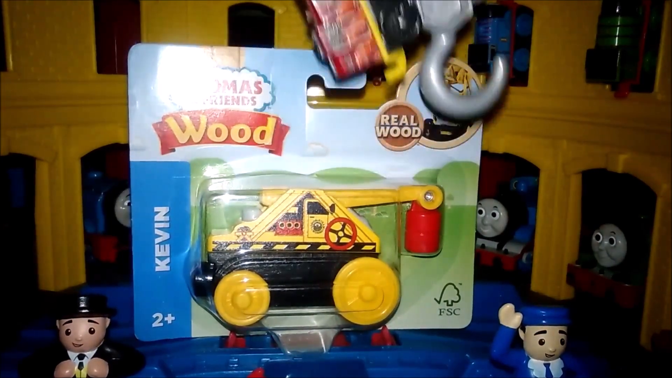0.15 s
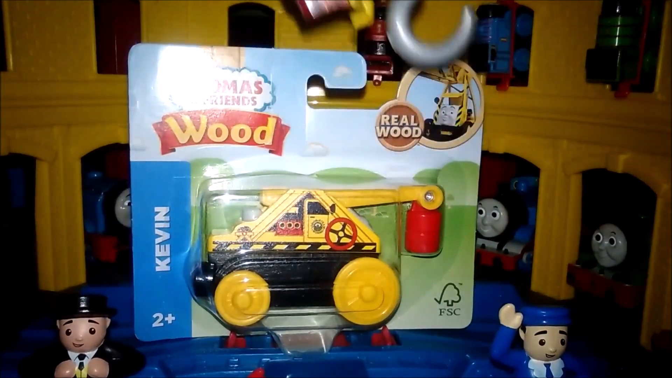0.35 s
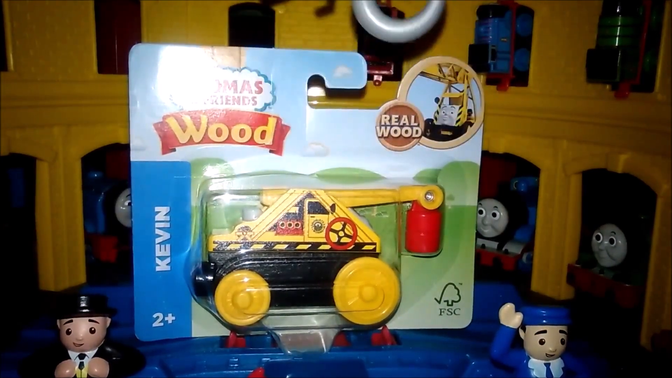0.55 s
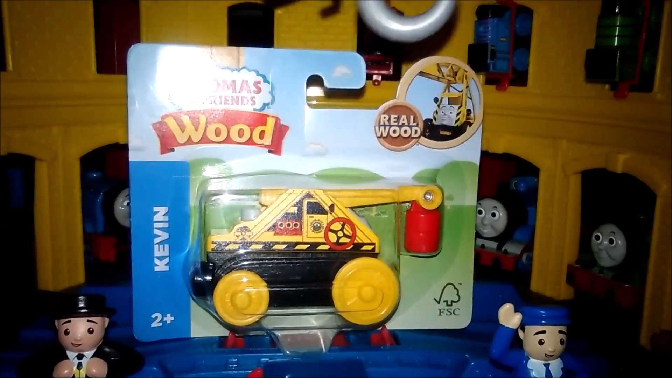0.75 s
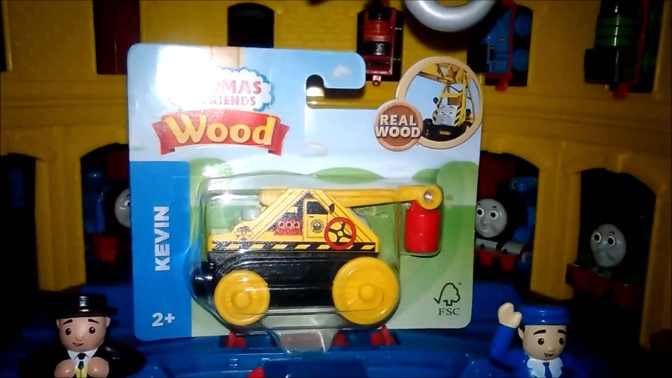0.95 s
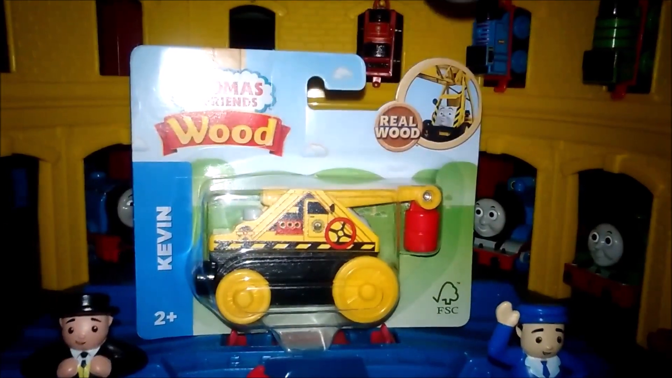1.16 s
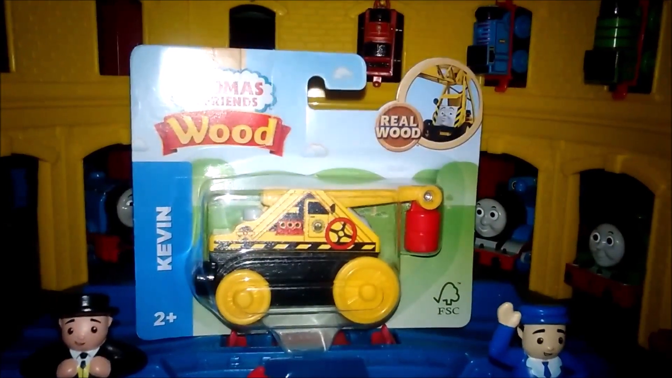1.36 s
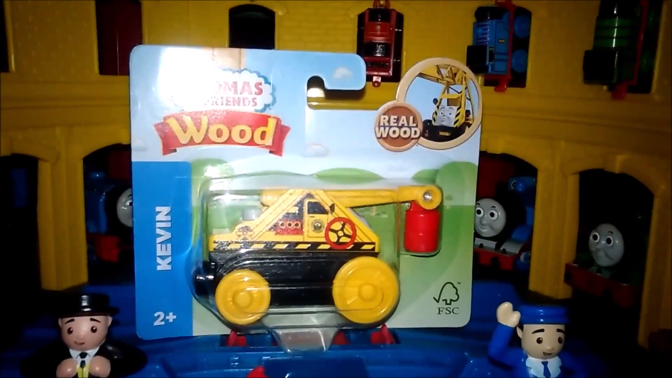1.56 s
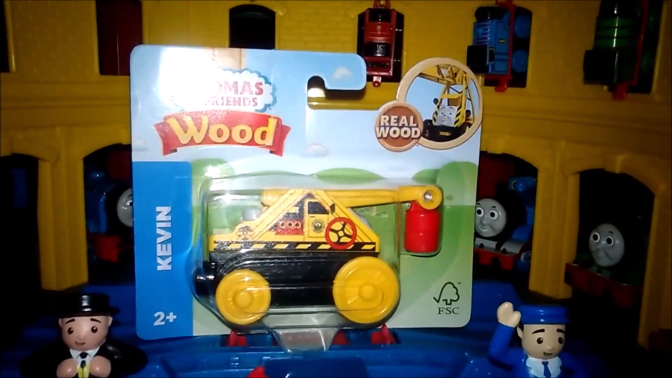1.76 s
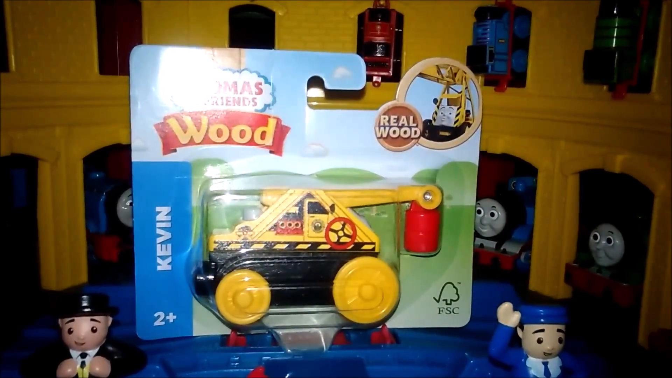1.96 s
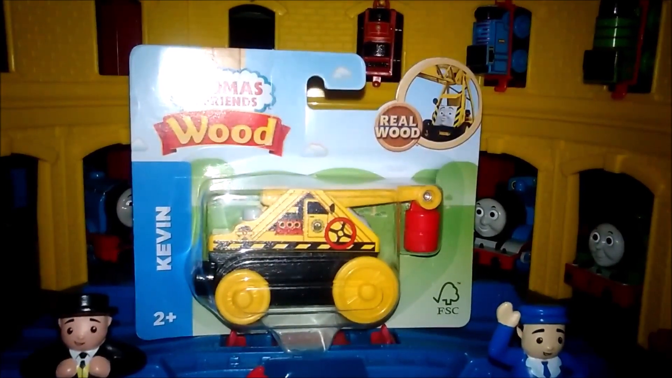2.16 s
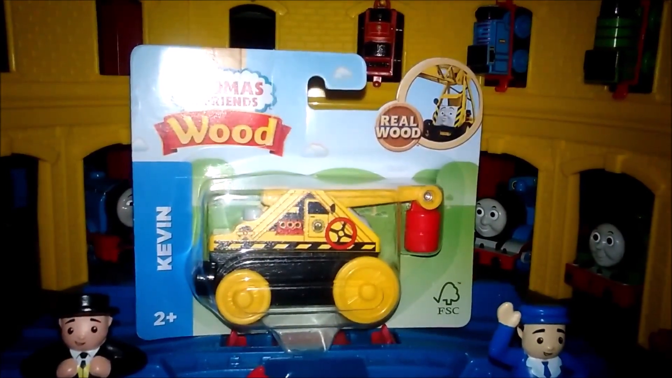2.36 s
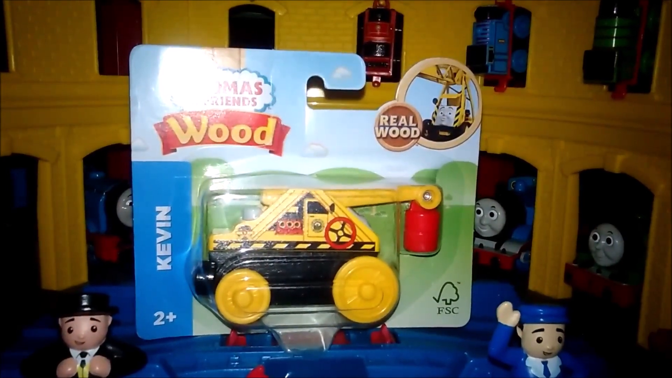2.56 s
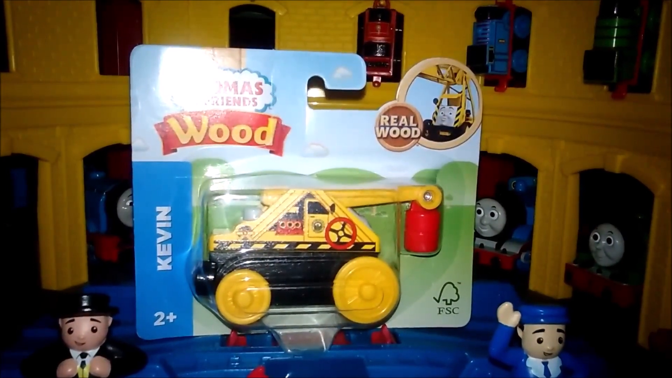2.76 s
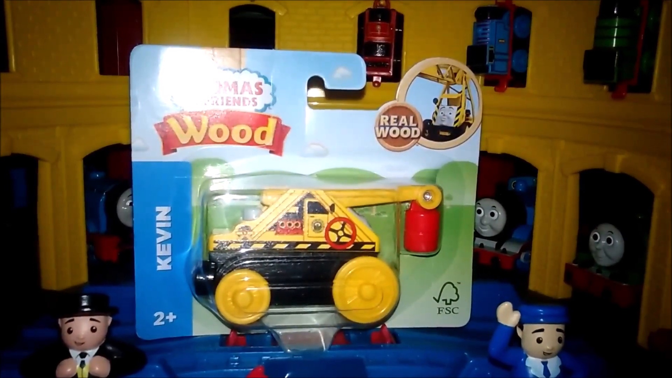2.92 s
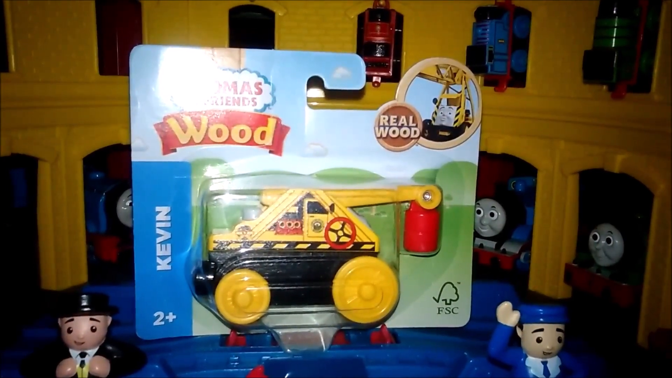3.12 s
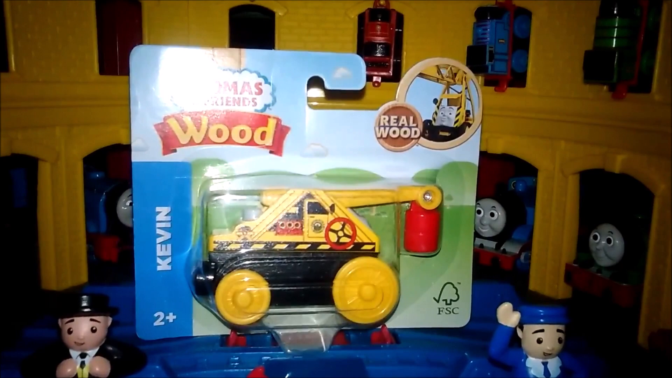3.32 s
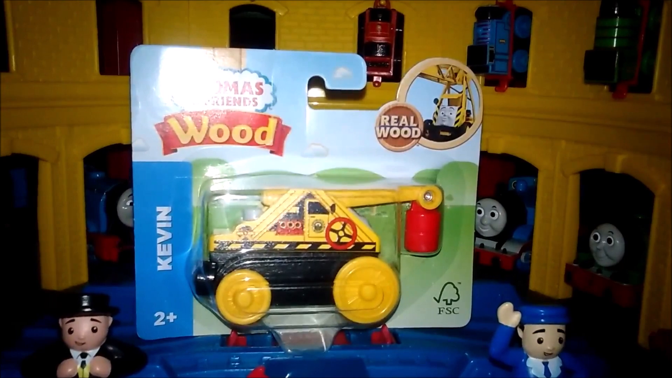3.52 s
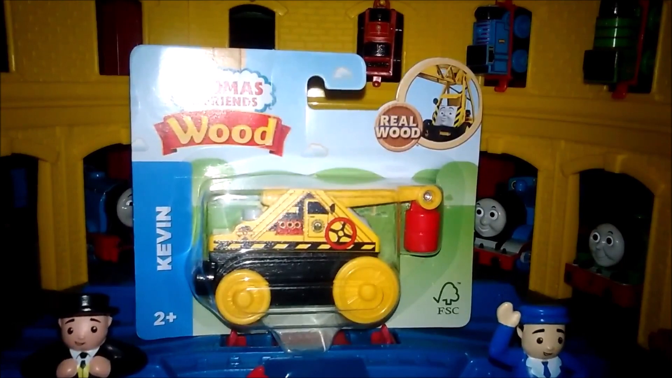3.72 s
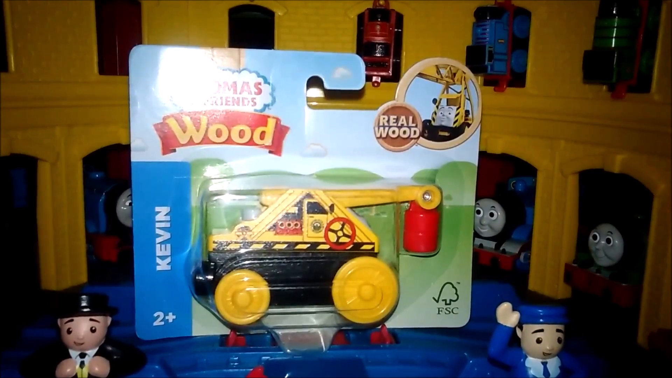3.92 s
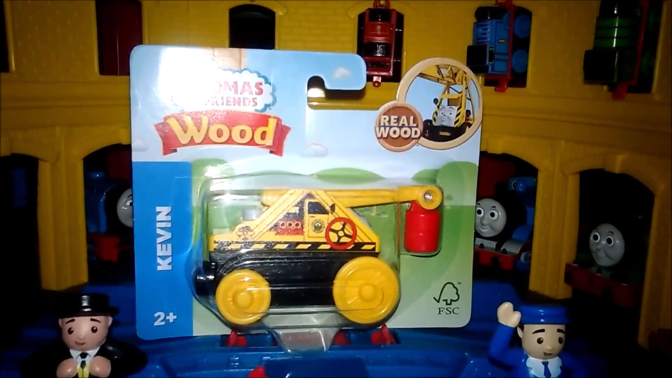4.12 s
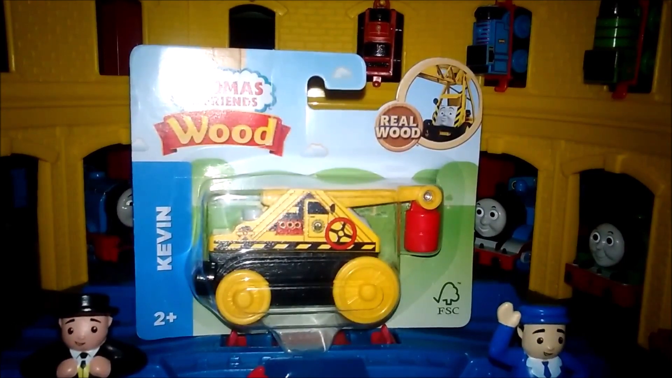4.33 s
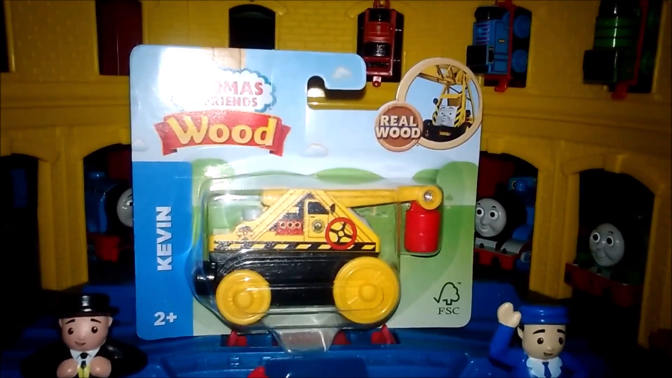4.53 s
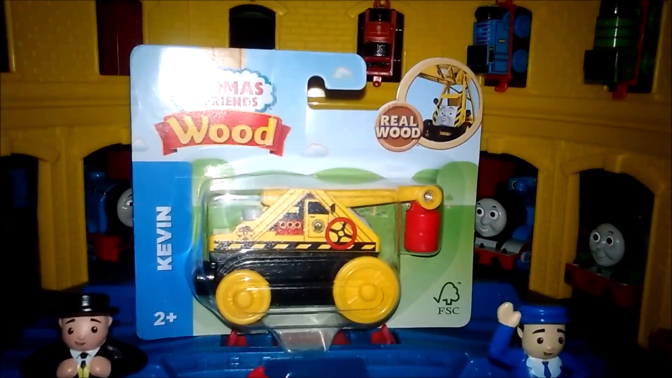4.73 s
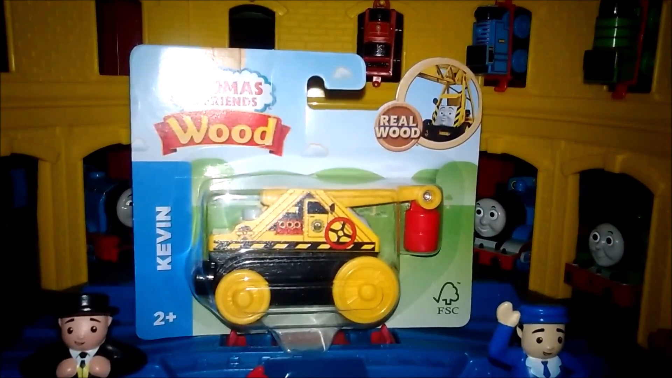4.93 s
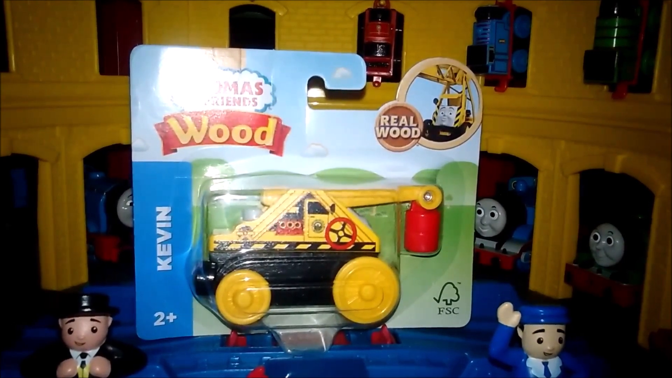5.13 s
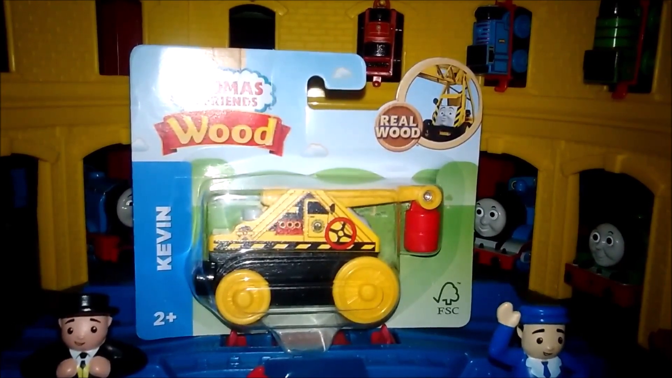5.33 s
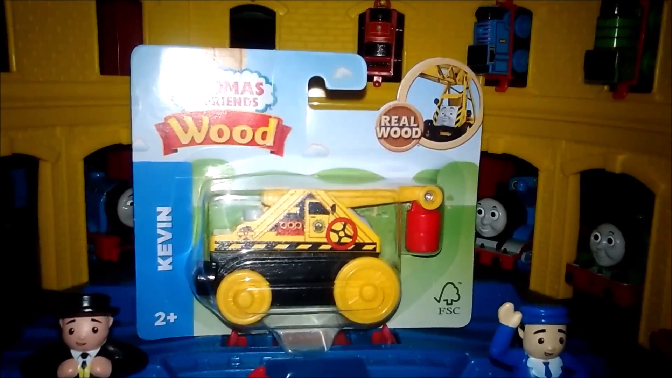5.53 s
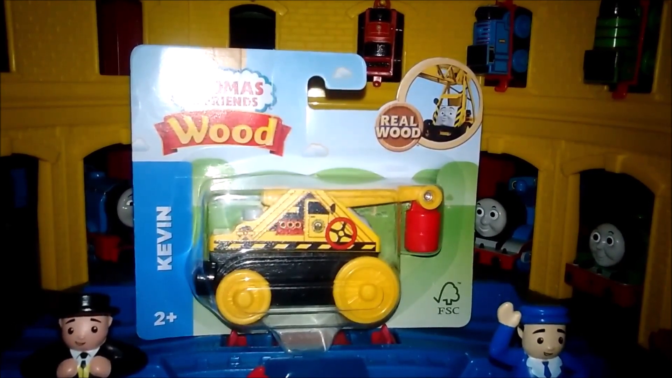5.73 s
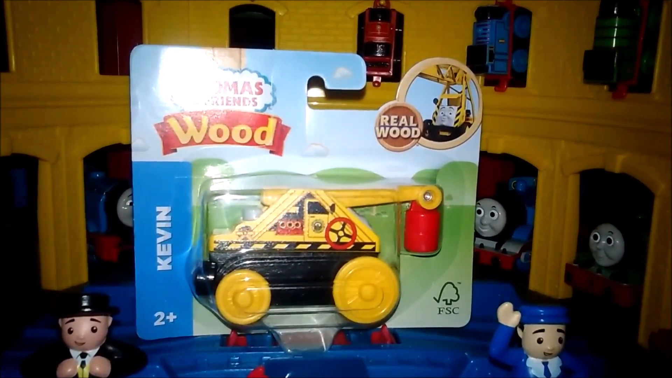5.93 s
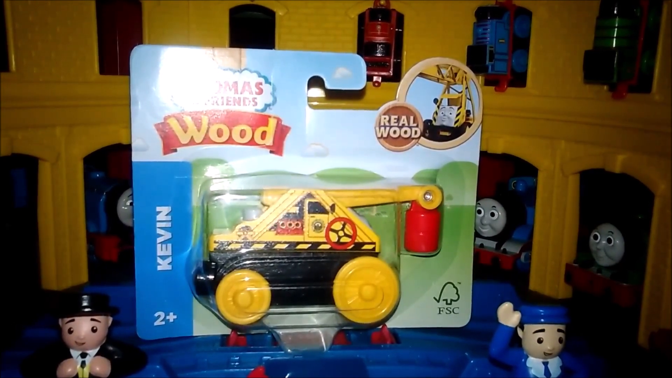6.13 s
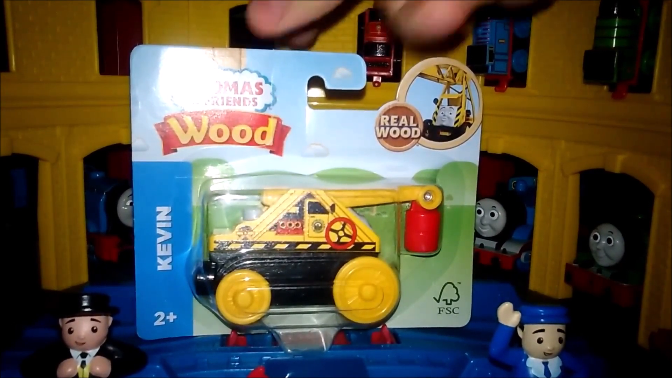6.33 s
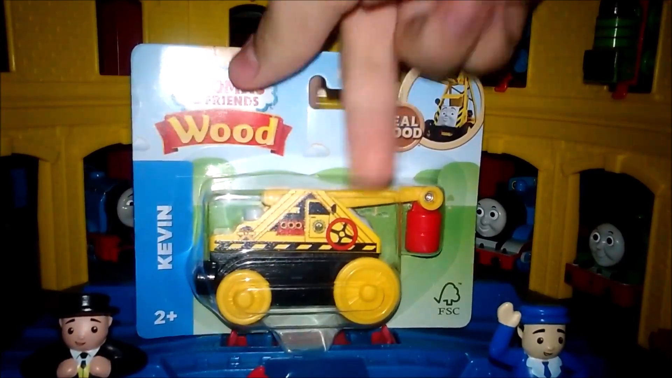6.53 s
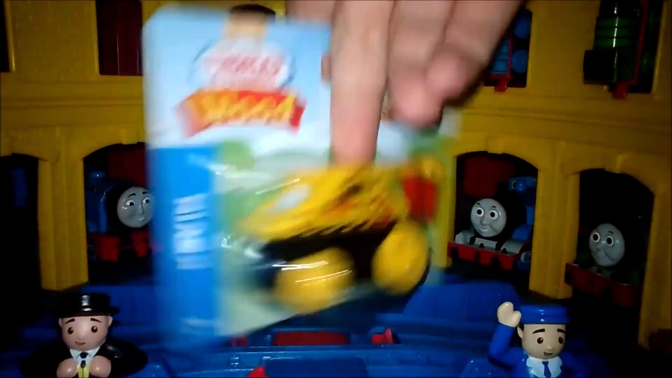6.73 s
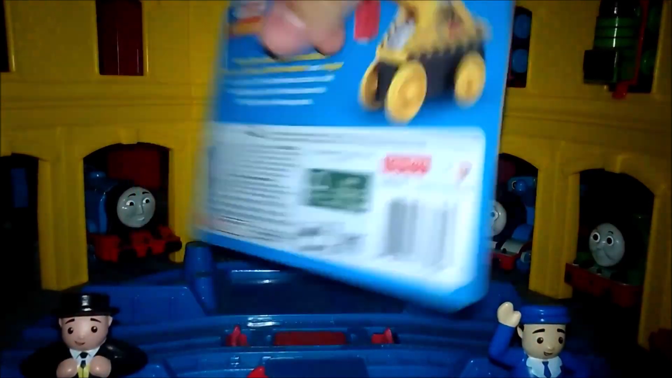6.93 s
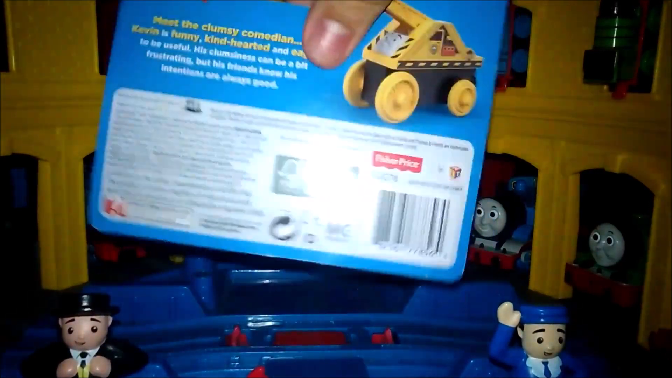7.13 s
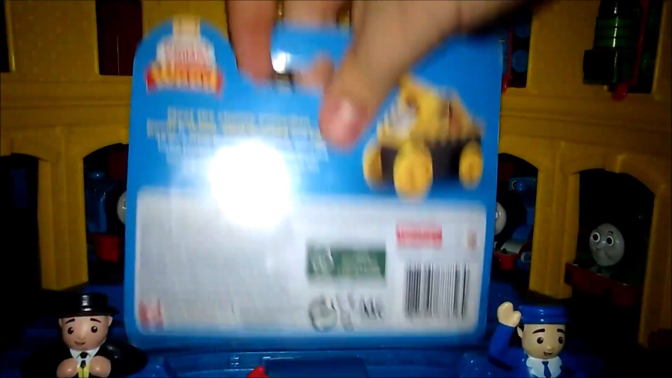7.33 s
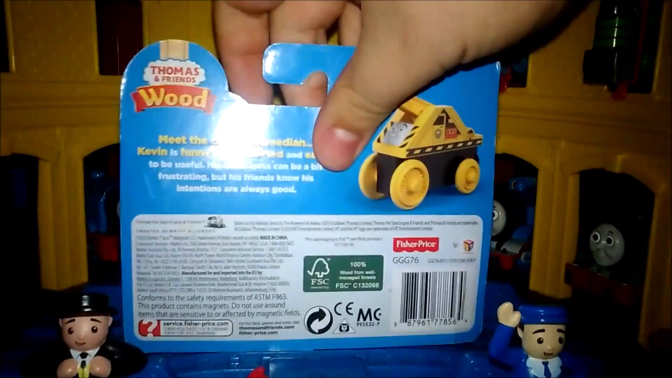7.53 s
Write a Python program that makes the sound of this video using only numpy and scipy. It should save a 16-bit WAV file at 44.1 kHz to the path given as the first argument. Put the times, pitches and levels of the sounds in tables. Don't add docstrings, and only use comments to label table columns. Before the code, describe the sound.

Close to the microphone in a small room, a plastic toy winch is cranked by hand: light ticks and dull knocks, then a fast hard ratchet rattle with thumps through the table, then irregular clicking. Two very loud snaps come close together before it stops. A card-and-plastic pack is picked up and turned with scuffs and taps over low rumble, hum and hiss.

```python
import sys
import numpy as np
from scipy import signal
from scipy.fft import rfft, irfft, next_fast_len
from scipy.io import wavfile
from scipy.ndimage import uniform_filter1d, map_coordinates

SR = 44100
rng = np.random.default_rng(int(sys.argv[2]) if len(sys.argv) > 2 else 0)


def nominal_scale(level):
    x = np.asarray(level, float) / 20
    return 10 ** x


def transcribe(u):
    v = np.clip(np.atleast_2d(u).T, -1, 1)
    q = np.round(v * 32767).astype(np.int16)
    wavfile.write(sys.argv[1], SR, q)


N = 333969
PACK_S = 6.3

# pitch_hz [Hz], width_hz [Hz], level_db [dB]
TEETH = [(3657, 515, -3.5), (4480, 250, 1.5), (5000, 850, -1.5), (6160, 720, 1.5), (6824, 530, 2.5),
         (7500, 2040, -9.5)]
# pitch_hz [Hz], width_hz [Hz], level_db [dB]
FRAME = [(1520, 275, -1.5), (1990, 237, 2), (2300, 540, -1), (3100, 400, -6.5)]


def unit(x):
    return x / np.sqrt(np.mean(x ** 2) + 1e-20)


def along(points, hz):
    f, v = np.transpose(points)
    return np.interp(np.log(hz + 1), np.log(f + 1), v)


def curves(rows):
    s, *columns = np.transpose(rows)
    t = np.arange(N) / SR
    from_edge = np.minimum(t - s[0], s[-1] - t) / 0.015
    open_start = s[0] < 0.05
    open_end = (s[-1] > 7.5) * (t > s[0] + 0.05)
    inside = np.clip(from_edge + open_start + open_end, 0, 1)
    return [np.interp(t, s, column) for column in columns] + [inside]


def wobble(rate):
    coarse = np.arange(0, N + 64, 64)
    knots = rng.standard_normal(int(N * rate / SR) + 6)
    return np.interp(np.arange(N), coarse, map_coordinates(knots, [coarse * rate / SR]))


def filtered(x, response):
    m = next_fast_len(N + 8192, real=True)
    return irfft(rfft(x, m) * response(np.fft.rfftfreq(m, 1 / SR)), m)[..., :N]


def noise(spectrum):
    return unit(filtered(rng.standard_normal(N), lambda hz: nominal_scale(along(spectrum, hz))))


def ringing(x, modes):
    def shape(f):
        total = 0
        for k, (centre, width, db) in enumerate(modes):
            damping = 1j * f * width
            total = total + (-1) ** k * nominal_scale(db) * damping / (centre * centre - f * f + damping)
        return total

    mean = np.sqrt(np.mean(abs(shape(np.linspace(1, SR / 2, num=4000))) ** 2))
    return filtered(x, shape) / mean


def rumble():
    # pitch_hz [Hz], level_db [dB per Hz]
    deep = [(8, -14), (20, 18), (45, -2), (65, 1), (100, -67)]
    # pitch_hz [Hz], level_db [dB per Hz]
    upper = [(35, -40), (60, 2.5), (100, 2.5), (125, -7), (170, -26), (260, -50.5)]
    # time_s [s], level_db [dB]
    shake = [(0, -44.5), (.33, -47), (1.07, -38), (1.82, -40.5), (2.09, -32.5), (3.52, -37), (3.93, -33.5),
             (4.32, -50), (5.01, -35.5), (5.9, -40.5), (6.5, -40), (7.25, -34.5), (7.57, -31)]
    # time_s [s], level_db [dB]
    traffic = [(0, -42), (.33, -47), (1.07, -43.5), (1.82, -50), (2.09, -41.5), (3.52, -33.5),
               (3.93, -37.5), (4.32, -32), (4.63, -33), (5.01, -34.5), (5.9, -39), (6.1, -24.5),
               (7.57, -36)]
    shake_level = nominal_scale(curves(shake)[0] + 4.5 + 4.0 * wobble(8.5))
    traffic_level = nominal_scale(curves(traffic)[0] - 1.5 + 1.7 * wobble(10))
    return shake_level * noise(deep) + traffic_level * noise(upper)


def hiss():
    # pitch_hz [Hz], level_db [dB per Hz]
    air = [(60, -55), (130, -18), (160, -14.5), (220, -14.5), (310, -16), (360, -21.5), (500, -26.5),
           (1000, -33), (2100, -36.5), (3500, -41.5), (6400, -38.5), (8000, -45), (11900, -51.5),
           (14500, -47)]
    return nominal_scale(-46.5) * noise(air)


def mains_hum():
    # pitch_hz [Hz], level_db [dB]
    mains = [(120.3, -38.5), (166, -83), (312, -57)]
    t = np.arange(N) / SR
    return sum(np.sqrt(2) * nominal_scale(db + 1.5 * wobble(6.7)) * np.sin(2 * np.pi * hz * t) for hz, db in mains)


def tone(rows, flutter_db):
    hz, db, inside = curves(rows)
    level = np.sqrt(2) * nominal_scale(db + flutter_db * wobble(11)) * inside
    return level * np.sin(2 * np.pi * np.cumsum(hz) / SR)


def vehicles():
    # time_s [s], pitch_hz [Hz], level_db [dB]
    slowing = [(3.88, 118, -31.5), (4.478, 79.86, -30), (4.612, 79.7, -39), (4.788, 70.7, -37),
               (5.002, 63.5, -26), (5.08, 63.8, -42)]
    slowing_again = [(5.05, 117.8, -31), (5.546, 86.7, -44), (5.726, 81, -43), (5.8, 83, -35)]
    sinking = [(3.699, 72.9, -24), (3.85, 58.4, -34), (4.0, 44.4, -42), (4.15, 33, -30)]
    idling = [(5.95, 66.3, -55), (6.15, 66.85, -23), (6.25, 65, -27.5), (6.4, 65.17, -14.5),
              (6.6, 65.12, -21.5), (6.9, 65.1, -21), (7.25, 65.47, -23), (7.57, 67.5, -32)]
    booming = [(6.05, 97.6, -46), (6.07, 97, -56), (6.324, 88, -28.5), (6.904, 91.4, -37),
               (6.95, 87.5, -53)]
    return sum(tone(rows, flutter_db=-0.7) for rows in (slowing, slowing_again, sinking, idling, booming))


def table_bumps():
    # time_s [s], peak_db [dB], pitch_hz [Hz], length_cycles [cycles]
    pushes = [(0.872, -23, 45, 1.8), (1.954, -18, 31, 2.2), (2.335, -7.5, 48.7, 0.86),
              (2.709, -9.5, 59.4, 1.66), (2.705, -16, 148, 1.4), (2.76, -12, 49.4, 1.1),
              (2.851, -18, 41, 2.6), (3.083, -9, 37.2, 0.48), (3.682, -13.5, 110, 3.4),
              (5.212, -20.5, 35, 1.5), (5.737, -13, 38.7, 0.5), (7.292, -9, 38.3, 2.8),
              (7.299, -27.5, 149, 1.6), (7.48, -11.5, 211, 1.9), (7.565, -22.5, 230, 1.45)]
    t = np.arange(N) / SR
    out = np.zeros(N)
    for s, db, hz, cycles in pushes:
        swell = np.exp(-((t - s) * hz / cycles * 1.78) ** 2)
        out -= nominal_scale(db) * swell * np.cos(2 * np.pi * hz * (t - s))
    return out


def room(x):
    # pitch_hz [Hz], t60_s [s]
    decay = [(200, 0.2), (2000, 0.17), (6000, 0.18), (12000, 0.26)]
    out, hop = np.zeros(N + SR), SR // 3
    for start in range(0, N, hop):
        hz, t, z = signal.stft(rng.standard_normal(hop), SR, nperseg=256)
        dying = z * nominal_scale(-60 * t / along(decay, hz)[:, None])
        tail = signal.istft(dying, SR, nperseg=256)[1]
        wet = signal.fftconvolve(x[start:start + hop], tail / np.linalg.norm(tail))
        out[start + 130:][:len(wet)] += wet
    return out[:N]


def squeaks():
    # start_s [s], end_s [s], pitch_hz [Hz], width_hz [Hz], level_db [dB]
    slides = [
        (1.338, 1.452, 2180, 450, -41.5),
        (3.812, 3.883, 1780, 400, -42),
        (6.88, 7.079, 2110, 200, -54),
        (7.15, 7.32, 2094, 200, -54),
    ]
    out = np.zeros(N)
    for start, end, hz, width_hz, db in slides:
        span = slice(round(start * SR), round(end * SR))
        size = span.stop - span.start
        band = signal.butter(2, [hz - width_hz / 2, hz + width_hz / 2], "band", fs=SR, output="sos")
        squeak = unit(signal.sosfilt(band, rng.standard_normal(SR // 2))[:size])
        out[span] += nominal_scale(db) * np.sqrt(np.hanning(size)) * squeak
    return out


def effort(rows):
    s, db, swell, fade = np.transpose(rows)[:4, :, None]
    t = np.arange(0, N + 32, 32) / SR
    each = db - 20 * np.maximum((s - t) / swell, (t - s) / fade)
    strongest_db = np.interp(np.arange(N) / SR, t, each.max(axis=0))
    return strongest_db, np.repeat(each.argmax(axis=0), 32)[:N]


def grains(per_s, spread_db):
    draw = rng.random((int(per_s * N / SR), 4))
    modes = np.vstack([TEETH, FRAME])[:, 0]
    hz = modes[(draw[:, 1] * len(modes)).astype(int)] * (0.86 + 0.083 * draw[:, 2])
    t = np.arange(512) / SR
    size_db = spread_db * -np.log(1.05 - draw[:, 3:])
    rings = nominal_scale(size_db - 60 * t / 0.025) * np.sin(2 * np.pi * hz[:, None] * t)
    rings = rings * np.cos(np.pi / 2 * t / t[-1])
    at = (draw[:, :1] * N).astype(int) + np.arange(len(t))
    return unit(np.bincount(at.ravel(), rings.ravel(), minlength=N)[:N])


def rubbing(level_db, frame_db, hollow_db, per_s, spread_db, tick_s):
    sizes = nominal_scale(spread_db * np.clip(rng.standard_normal((2, N)), -2, 1.6))
    ticks = (rng.random((2, N)) < per_s / SR) * sizes
    chatter = signal.lfilter([1], [1, -np.exp(-1 / (tick_s * SR))], ticks)
    shared = chatter[[0, 0, 1, 1]] + 0.5 * chatter[[1, 1, 0, 0]]
    chatter = np.sqrt(0.73 + unit(shared) ** 2)
    drive = unit(chatter * rng.standard_normal((4, N))) * nominal_scale(level_db)
    frame = nominal_scale(frame_db - 1.0 + 3.55 * wobble(25))
    hollow = nominal_scale(hollow_db + 3.75 * wobble(18))
    return drive * np.array([np.ones(N), np.full(N, nominal_scale(-15.0)), frame, hollow])


def contacts():
    # time_s [s], peak_db [dB], ring_hz [Hz], body_share_db [dB]
    pawl = [(0.2473, -34, 7000, -4), (0.3322, -29, 5980, -27), (.637, -24, 3700, -11),
            (.814, -28, 4550, -9), (0.8972, -19, 5350, -15), (0.943, -26, 6800, -15),
            (1.034, -25.5, 6200, -5), (1.4514, -21, 5900, -11), (1.5893, -18, 5860, -8),
            (1.8132, -20, 5940, -15), (1.8271, -19.5, 5640, -13), (2.0508, -24, 4440, -10),
            (2.175, -28.5, 4480, -8), (3.326, -18.5, 5940, -5.5), (3.7362, -12.5, 5880, -11.5),
            (4.0086, -26, 4360, -4), (4.0811, -28, 6700, -8), (4.1637, -36, 5200, 3),
            (4.2522, -12.5, 6070, -32), (4.3007, -18.5, 5940, -6.5), (4.8893, -25.5, 4950, -15),
            (5.468, 5, 5680, -10.5), (5.5634, 5, 4480, -9), (5.7063, -19, 6060, -15),
            (5.7334, -25, 2600, -6), (5.8935, -33, 2880, -12), (5.916, -17, 7400, -12.5)]
    rattle = [(2.349, -27.5, 6100, -3), (2.4026, -14, 5900, -22), (2.4182, -10.5, 5800, -15),
              (2.4518, -14, 4320, -10.5), (2.492, -8.5, 6530, -14), (2.576, -23, 4500, -3),
              (2.6235, -10.5, 5540, -10.5), (2.6968, -10, 5240, -11.5), (2.7281, -7.5, 6970, -13.5),
              (2.799, -9, 5250, -19), (2.804, -5, 5820, -38), (2.8663, -17.5, 5900, -20),
              (2.8761, -15, 6060, -27), (2.9108, -16.5, 6000, -8), (2.991, -20, 4270, -20),
              (3.0025, -17.5, 1890, -5.5), (3.027, -17.5, 3820, -18), (3.0574, -25, 6750, -5)]
    knocks = [(0.3793, -29, 1720, -11), (.523, -22.5, 2310, -22), (.5867, -29, 1430, -6.5),
              (0.726, -31.5, 1500, -2), (0.7985, -22, 1740, -4.5), (0.8667, -17, 1930, -13),
              (0.9158, -20, 1920, -9), (1.2738, -32, 1860, -7), (1.6209, -22, 2350, -18),
              (1.71, -23, 1990, -9), (1.8487, -18, 2300, -12.5), (2.0262, -20.5, 1950, -24),
              (2.0798, -19.5, 1410, -10), (2.222, -31, 1870, -24), (3.496, -25.5, 1420, -5.5),
              (3.83, -28.5, 1830, -7), (3.927, -28, 1450, -12), (4.1747, -22.5, 1990, -5),
              (4.198, -15.5, 1480, -10), (4.2203, -11, 1950, -25), (4.3413, -24, 1920, -8.5),
              (4.4819, -27, 1430, -4), (4.5195, -23, 1520, -12), (4.6906, -22, 1820, -18),
              (4.7153, -19, 2214, -21), (4.8538, -27, 1520, -0.5), (4.9792, -27, 1500, -4.5),
              (5.0934, -25.5, 1860, -7), (5.1866, -22.5, 1520, -4.5), (5.39, -25, 1850, -5)]
    taps = [
        (6.68, -26, 1650, -7),
        (6.6996, -42, 1560, -5),
        (6.7535, -28, 6500, -10),
        (6.7814, -20.5, 2170, -2),
        (6.8463, -20, 5830, -26),
        (7.112, -19.5, 7000, -18),
        (7.4722, -7, 1460, -9.5),
    ]
    hollow_over_frame = [-10, -9.5, -6, 4]

    drive, t = np.zeros((5, N + SR)), np.arange(SR // 10) / SR
    life_s = np.array([[0.028], [0.02], [0.038], [0.045], [0.018]])
    shape = (1 - np.exp(-t / 0.00064)) * nominal_scale(-60 * t / life_s)
    for rows, over_db in zip((pawl, rattle, knocks, taps), hollow_over_frame):
        for s, db, hz, frame_db in rows:
            grit = rng.standard_normal((5, len(t)))
            grit[4] = np.sin(2 * np.pi * hz * t)
            shares = np.array([[-4], [-19.0 + 1.35 * db], [frame_db], [frame_db + over_db + 4.5],
                               [-8 - 0.33 * db]])
            drive[:, round(s * SR):][:, :len(t)] += grit * shape * nominal_scale(db + shares)
    return drive[:, :N]


def winch_and_pack():
    # pitch_hz [Hz], width_hz [Hz], level_db [dB]
    drum = [(230, 42, -6.5), (351, 95, -4), (596, 155, -1), (758, 150, -3), (1152, 140, -3)]
    card = [(230, 81, -5), (400, 42, -3), (670, 270, -3), (1050, 304, -1), (1300, 420, -7.5)]
    edges = [(8400, 1600, -1), (10630, 1400, -1), (12600, 2700, -8)]
    # hardest_s [s], rub_db [dB], swell_s [s per 20 dB], fade_s [s per 20 dB]
    strokes = [(0, -51.5, 0.062, 0.12), (.268, -43, 0.064, 0.076), (.42, -37, 0.12, 0.27),
               (.538, -36, .3, 0.083), (.634, -49, .02, 0.23), (.948, -35, 0.18, 0.037),
               (1.155, -45, 0.45, 0.26), (1.455, -44.5, 0.62, 0.15), (1.6, -40.5, 0.38, 0.16),
               (1.87, -37, .45, 0.077), (2.09, -38.5, 0.14, .12), (2.235, -47.5, .15, .12),
               (2.414, -29, 0.11, 0.75), (2.742, -30, 0.53, 0.13), (2.802, -27.5, 0.08, 0.027),
               (2.864, -31.5, .02, 0.35), (3.33, -34, 0.19, 0.34), (3.52, -37.5, 0.89, .06),
               (3.625, -39.5, 0.045, 0.13), (3.76, -44, 0.041, .12), (4.0, -40.5, 0.36, 0.045),
               (4.012, -31.5, 0.022, 0.094), (4.26, -30, 0.13, 0.23), (4.5, -40.5, 0.56, 0.43),
               (4.696, -38, 0.068, 0.13), (4.852, -47, .02, .6), (5.088, -38, 0.03, .3),
               (5.24, -34, 0.21, 0.2), (5.66, -30.5, 0.27, 0.16), (5.94, -41.5, 0.066, 0.036)]
    # hardest_s [s], rub_db [dB], swell_s and fade_s [s per 20 dB], card_share_db [dB]
    scuffs = [
        (6.7, -53.5, 0.077, 0.28, 15.5),
        (6.759, -30.5, 0.024, 0.015, 4.5),
        (6.796, -20, 0.022, 0.05, 4.5),
        (6.85, -39, .06, 0.038, 1),
        (6.954, -37.5, 0.02, 0.064, 9),
        (7.1, -52.5, .45, 0.76, -6),
        (7.125, -50, 0.027, 0.11, 12),
        (7.49, -33, 0.0096, 0.05, -8),
        (7.57, -46, 0.029, .1, 24),
    ]
    pack = np.arange(N) > PACK_S * SR
    crank_db = effort(strokes)[0]
    scuff_db, scuff = effort(scuffs)
    rub_db = np.maximum(crank_db, scuff_db)

    hard = np.clip(crank_db + 39, -14, 20)
    card_db = uniform_filter1d(np.array(scuffs)[scuff, -1], size=400)
    frame_db = np.where(pack, -1.5, -1.5 - 0.16 * hard)
    hollow_db = np.where(pack, card_db, -4.5 - 0.24 * hard)

    *struck, rings = contacts()
    rubbed = rubbing(rub_db, frame_db, hollow_db, per_s=170, spread_db=8.5, tick_s=0.0041)
    teeth, sheen, frame, hollow = struck + rubbed
    body = ringing(hollow * ~pack, drum) + ringing(hollow * pack, card)
    ticks = nominal_scale(rub_db - 4.5) * grains(per_s=130, spread_db=6.5)
    return ringing(teeth, TEETH) + ringing(sheen, edges) + ringing(frame, FRAME) + body + rings + ticks


def scene():
    background = rumble() + vehicles() + mains_hum() + hiss()
    near = winch_and_pack() + squeaks()
    wet_db = np.where(np.arange(N) > PACK_S * SR, -5, 0)
    reflected = room(near * nominal_scale(wet_db))
    mix = nominal_scale(-2.5) * near + nominal_scale(-8.5) * reflected + table_bumps() + background
    return np.tile(mix, (2, 1))


def roll_off(x):
    return signal.sosfilt(signal.butter(12, 15610, fs=SR, output="sos"), x)


def record(dry):
    # pitch_hz [Hz], share [0-1]
    width = [(3000, 0), (4000, .1), (5200, 0.2), (6500, 0.5), (9000, 1), (12000, 1), (14500, 1)]
    mid = dry[0] / (1 + abs(dry[0] / 0.99) ** 6) ** (1 / 6)
    hz, _, z = signal.stft(mid, SR, nperseg=256)
    blocks = rng.standard_normal((33, z.shape[1] // 8 + 1))
    blocks = unit(uniform_filter1d(uniform_filter1d(blocks, 2, 0), 2, 1))
    chance = np.kron(1 / (1 + np.exp(-1.7 * blocks)), np.ones((4, 8)))[:len(hz), :z.shape[1]]
    power = np.sum(abs(z[hz > 3000]) ** 2, axis=0)
    steady = power < 4 * uniform_filter1d(power, 24)
    differs = (chance < along(width, hz)[:, None]) * steady
    scrambled = z * differs * np.exp(2j * np.pi * rng.random(z.shape))
    side = nominal_scale(-4.5) * signal.istft(scrambled, SR, nperseg=256)[1][:N]
    both = np.array([mid + side, mid - side])
    finished = filtered(both, lambda f: nominal_scale(np.interp(f, [14200, 14600], [0, -42])))
    return roll_off(finished)


dry = scene()
out = record(dry)
transcribe(out)
```